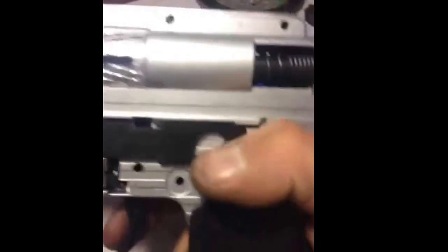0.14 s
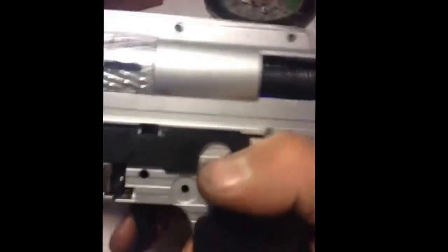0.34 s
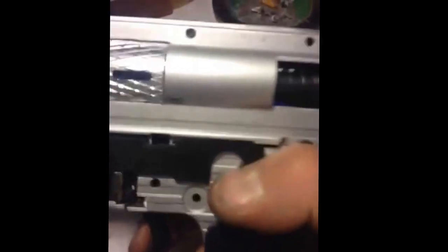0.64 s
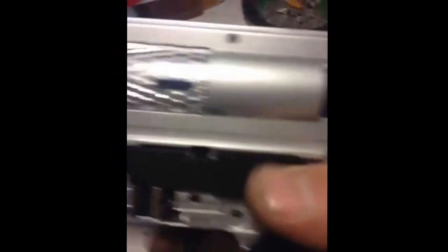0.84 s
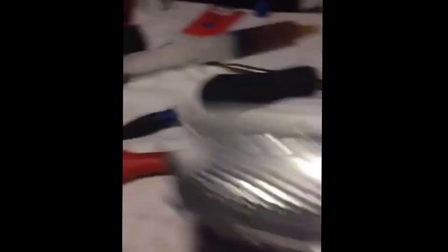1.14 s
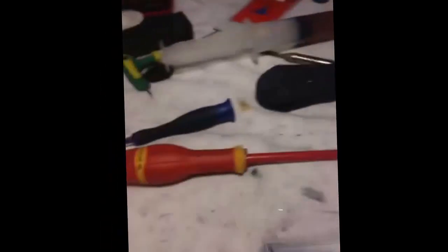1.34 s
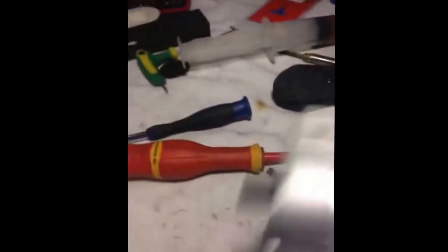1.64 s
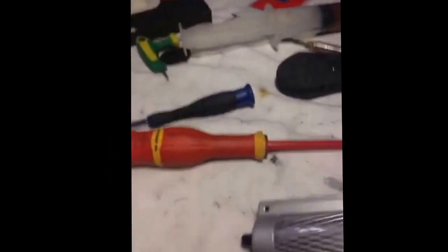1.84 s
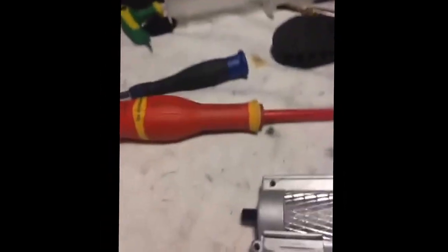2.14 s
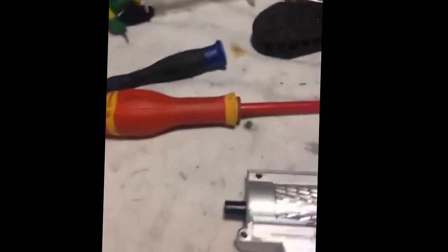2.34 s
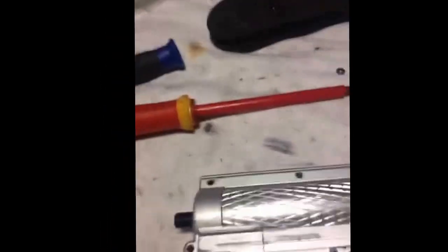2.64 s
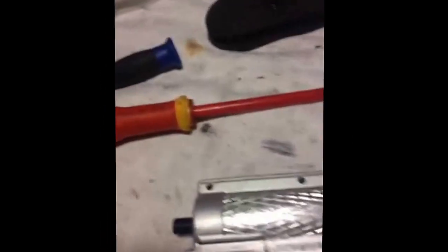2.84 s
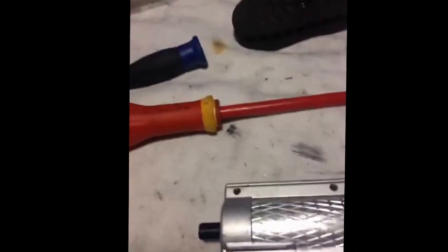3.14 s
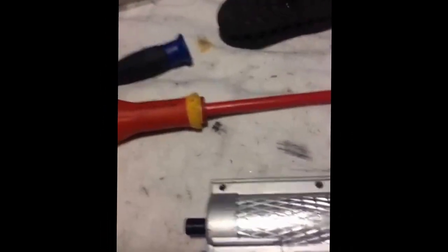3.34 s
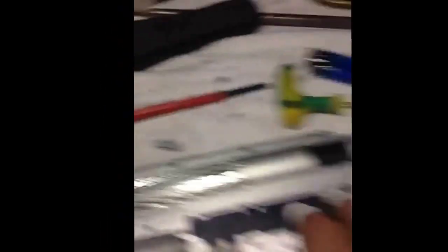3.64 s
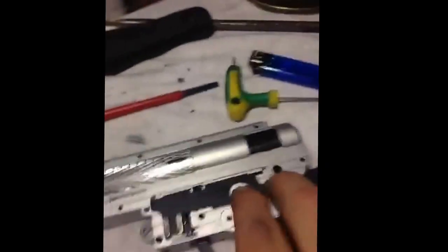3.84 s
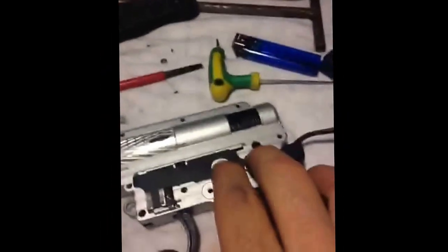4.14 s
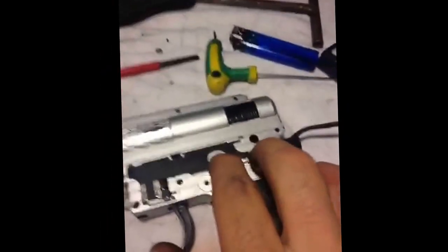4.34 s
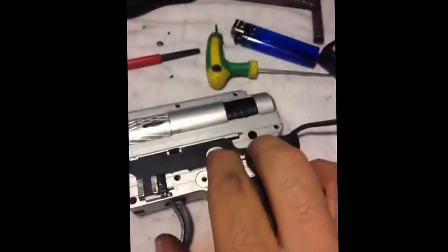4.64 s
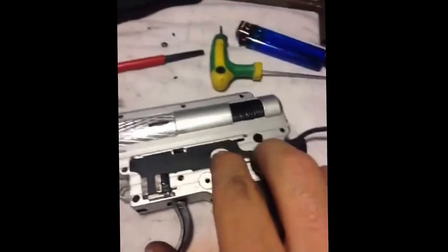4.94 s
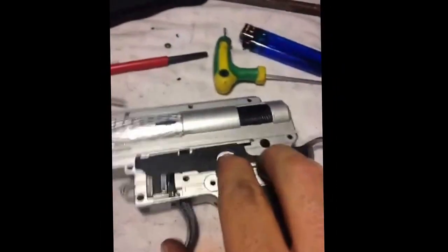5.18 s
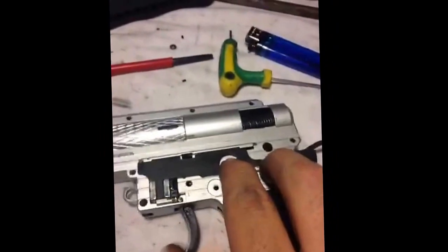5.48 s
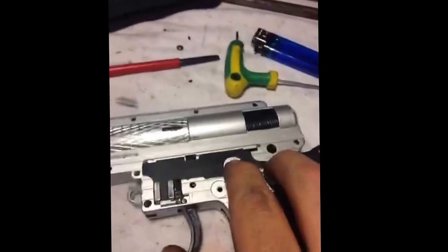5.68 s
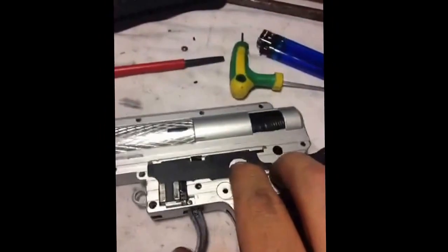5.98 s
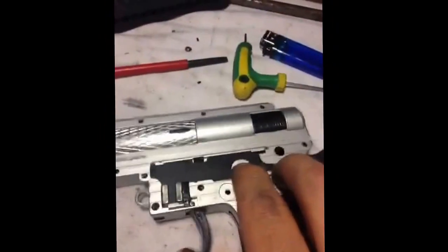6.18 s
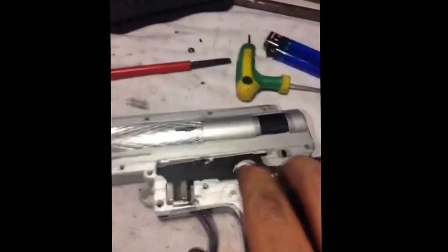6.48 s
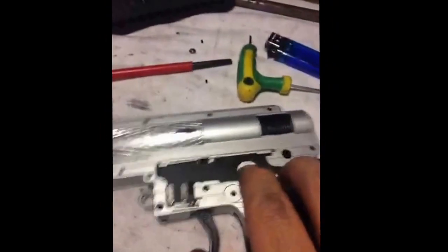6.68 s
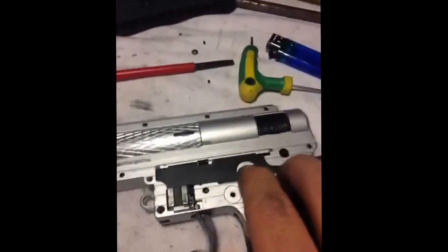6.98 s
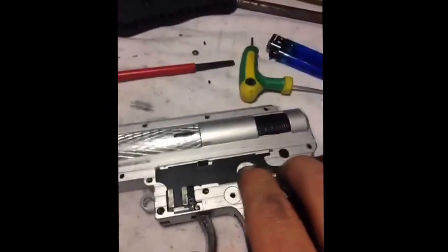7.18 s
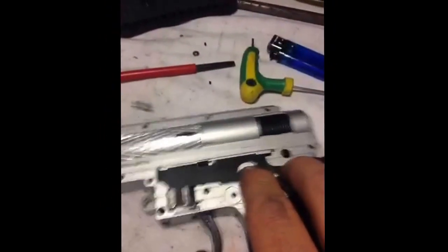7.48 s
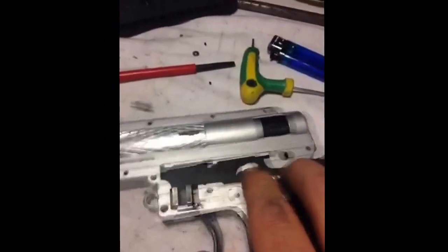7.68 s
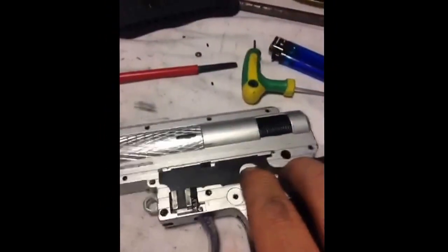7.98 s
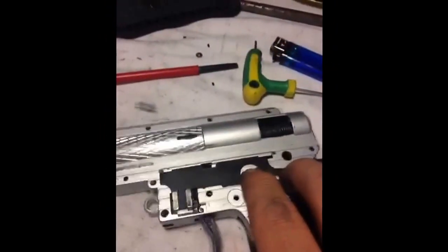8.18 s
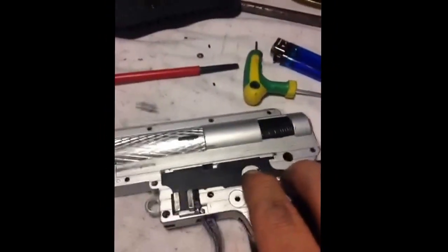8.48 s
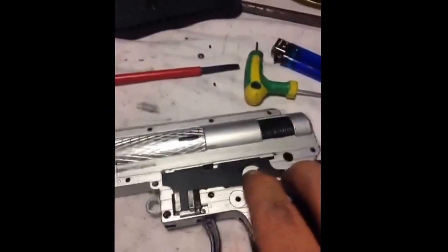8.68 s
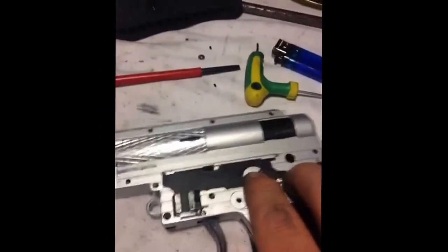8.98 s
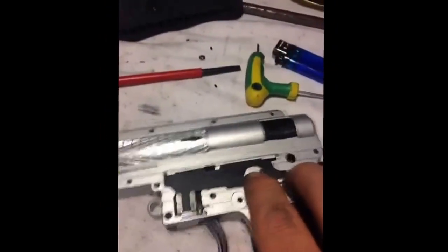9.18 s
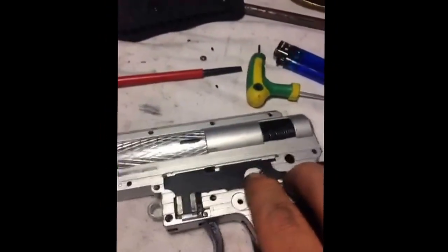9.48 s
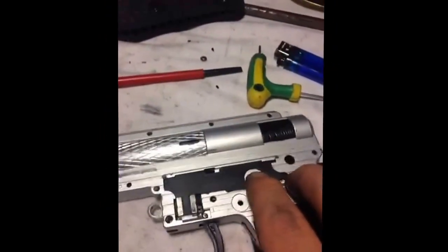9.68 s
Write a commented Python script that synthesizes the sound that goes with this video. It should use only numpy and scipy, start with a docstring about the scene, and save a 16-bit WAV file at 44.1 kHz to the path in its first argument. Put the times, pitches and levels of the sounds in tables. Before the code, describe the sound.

Two sharp electric gearbox clacks start right at the microphone, with a thin spring ringing after them. Light ticks, finger rubbing and woody bench knocks lead to one harder set-down clack. Quiet room noise with a barely audible thin tone fills the gap. Then the mechanism cycles repeatedly on the bench, zipping and slamming in fast, slightly uneven succession, dry and bright with a short workshop reverberation.

```python
"""Airsoft gearbox, dry-fired in a workshop

Small workshop, phone microphone close by: two shots in the hand, a few knocks as the bare gearbox is handled
and set down on the bench, then twenty shots in quick succession. In each shot gear-tooth impacts rasp while
they wind the spring, then the piston slams home and bounces once, ringing the shell with decaying modes.
Fingers rub and tick, a thin tone passes in the pause, and soft noise and a short reverberation fill the room."""
import sys
import numpy as np
from scipy import signal
from scipy.fft import rfft, irfft
from scipy.io import wavfile
from scipy.ndimage import uniform_filter1d

SR = 44100
rng = np.random.default_rng(int(sys.argv[2]) if len(sys.argv) > 2 else 0)


def digitize_waveform(pressure):
    """Quantize a signal to 16-bit integers and store it at the path in sys.argv[1].

    Rows of a 2-D input are taken as channels; values are limited to [-1, 1].
    """
    field = np.atleast_2d(pressure).T
    bounded = np.clip(field, -1, 1)
    quanta = np.round(bounded * 32767).astype(np.int16)
    wavfile.write(sys.argv[1], SR, quanta)


N = 433062
T = np.arange(N) / SR  # time in seconds


def undb(db):
    """Decibels to gain."""
    return 10 ** (np.asarray(db) / 20)


def unit(x):
    """Scale to an rms of 1."""
    return x / np.sqrt(np.mean(x ** 2))


def add(out, s, x):
    """Mix x into out from time s."""
    i = max(int(s * SR), 0)
    out[i:i + len(x)] += x[:len(out) - i]


def convolve(x, response):
    """Pass x through an impulse response."""
    return signal.fftconvolve(x, response)[:len(x)]


def high_pass(x, hz, order):
    """Remove the bass under hz."""
    return signal.sosfilt(signal.butter(order, hz, "high", fs=SR, output="sos"), x)


def colour(points, peaks=(), size=4096):
    """Causal (minimum-phase) response of unit energy from a smooth spectrum and its resonances."""
    f = np.fft.rfftfreq(size, 1 / SR) + 1
    hz, level_db = np.transpose(points)
    db = np.interp(np.log(f), np.log(hz), level_db)
    for centre_hz, width_hz, peak_db in peaks:
        db = db + peak_db / (1 + (2 * (f - centre_hz) / width_hz) ** 2)
    # folding the cepstrum onto positive times makes the response causal
    cepstrum = irfft(np.log(undb(db)))
    cepstrum[1:size // 2] *= 2
    cepstrum[size // 2 + 1:] = 0
    response = irfft(np.exp(rfft(cepstrum)))
    return response / np.linalg.norm(response)


def fade(t, t60):
    """Exponential decay, 60 dB down after t60 seconds."""
    return np.exp(-np.log(1000) * t / t60)


def swell(start_s, length_s):
    """A smooth rise and fall of height 1."""
    return np.sin(np.pi * np.clip((T - start_s) / length_s, 0, 1))


def push(ms):
    """Half-sine contact force of height 1."""
    return np.sin(np.pi * np.minimum(T[:SR // 50] * 10 ** 3 / ms, 1))


def burst(response, t60):
    """A short noisy click with the colour of a response."""
    t = T[:SR // 5]
    return convolve(rng.standard_normal(len(t)) * fade(t, t60), response)


def ring(modes, t, detune):
    """Decaying modes, a little differently tuned at each blow."""
    out = np.zeros(len(t))
    for hz, db, t60 in modes:
        tuned_hz = hz * (1 + detune * rng.standard_normal())
        out += undb(db) * fade(t, t60) * np.sin(2 * np.pi * tuned_hz * t)
    return out


# Spectrum of the quiet room at the microphone. Each row: frequency in Hz, relative density in dB per Hz.
AIR_SPECTRUM = [(30, -25.5), (70, -23.5), (135, -2), (210, -2), (330, -7), (400, -16.5), (650, -15.5),
                (1200, -20), (4000, -25), (10000, -32), (15000, -27.5)]
AIR_DB = -64.5  # rms before the microphone


def air():
    """Quiet room: noise shaped to be soft and low with a faint hiss."""
    return undb(AIR_DB) * unit(convolve(rng.standard_normal(N), colour(AIR_SPECTRUM)))


def teeth(t, start_hz=1500, top_hz=2500, spin_up_s=.025, scatter_db=4, scrape=1.0, wobble=0.07):
    """Tooth impacts speed up with the motor and throb once a turn of the ten-tooth pinion."""
    slip, speed_spread = .22, .06  # timing scatter in teeth; spread of motor speed between shots
    hz = top_hz + (start_hz - top_hz) * np.exp(-t / spin_up_s)
    hz = hz * (1 + speed_spread * rng.standard_normal())
    tooth = np.cumsum(hz) / SR  # teeth passed so far
    count = int(tooth[-1])
    late, hard = rng.standard_normal((2, count))
    at = np.interp(np.arange(count) + slip * late, tooth, np.arange(len(t))).astype(int)
    impacts = np.bincount(at, undb(scatter_db * hard), len(t))
    rasp = unit(impacts - impacts.mean()) + scrape * rng.standard_normal(len(t))
    return unit(rasp * (1 + wobble * np.sin(2 * np.pi * tooth / 10)))


# Shots beside the microphone. Each row: motor start in seconds, piston slam in seconds, then relative levels
# in dB of the gears, the slam and the low thump.
SHOTS = [(0.268, 0.3278, -7.5, -1, -4), (0.513, 0.575, -7.5, -2.5, -14.5), (4.729, 4.789, -8, -2, -18.5),
         (5.083, 5.1384, -10.5, -3.5, -2), (5.486, 5.544, -9.5, -3.5, -1),
         (5.771, 5.827, -10.5, -3.5, -4.5), (5.997, 6.053, -13, -2, -8.5), (6.185, 6.245, -13, -2, -5),
         (6.396, 6.458, -12.5, -2, -16), (6.581, 6.6428, -13, -3.5, -22), (6.791, 6.8516, -13.5, -3, -7.5),
         (6.974, 7.035, -12.5, -3.5, -6), (7.187, 7.246, -11.5, -3, -15.5),
         (7.374, 7.4343, -13, -2.5, -8.5), (7.6, 7.661, -12, -3, -6), (7.818, 7.881, -11, -3.5, -16),
         (8.018, 8.0798, -11, -3.5, -13), (8.237, 8.2961, -10.5, -1, -13), (8.467, 8.529, -10.5, -3, -4),
         (8.855, 8.917, -9.5, 0, -18), (9.069, 9.1323, -11.5, -2, 0), (9.282, 9.3401, -11.5, -7, -7)]
SET_DOWN_S = 2.2  # in the hand before this, on the bench after
# Gear rasp radiated by the shell, in the hand and on the bench. Each row: frequency in Hz, relative level in dB.
RASP_HELD = [(35, -49), (60, -25.5), (633, -9), (1100, -8), (1630, -2), (3190, -5), (3750, -5),
             (6380, -4.5), (7330, -2.5), (9900, -8.5), (15000, -12)]
RASP_BENCH = [(35, -40.5), (60, -26), (209, -0.5), (564, -7.5), (1100, -3.5), (1750, 0), (2470, -3.5),
              (3930, -7), (4730, -3.5), (5180, -7), (7330, -6), (7860, -6.5), (9230, -3.5), (10100, -9.5),
              (15000, -12)]
# Resonances standing out of that rasp. Each row: frequency in Hz, width in Hz, height in dB.
PEAKS_HELD = [(3190, 300, 5), (4500, 720, 3.5), (6400, 560, 4.5), (9440, 410, 6.5), (11390, 550, 5)]
PEAKS_BENCH = [(254, 17, 4), (1658, 70, 1.4), (2280, 500, 2.7), (3170, 530, 4.6), (4520, 640, 1.7),
               (7940, 1100, 6.3), (9070, 400, 3.9)]
REST_S = 1  # a shot after a longer pause than this starts with the gears already under load
SLACK_DB, RESTED_SLACK_DB = -12, 1  # rasp at the start of winding re its end: in a run, and after a rest
LATCH_S, LATCH_DB = 0.0044, -12.5  # anti-reversal latch as the gears take up: delay, level re the rasp


def gears(attack_s=0.015, loaded=.68, coast_t60=0.068, held_db=0, bench_db=-1.5):
    """The latch clicks; the rasp changes with spring load and dies quickly once the piston is let go."""
    out, t, last_slam = np.zeros(N), T[:SR // 8], -np.inf
    held = undb(held_db) * colour(RASP_HELD, PEAKS_HELD)
    lying = undb(bench_db) * colour(RASP_BENCH, PEAKS_BENCH)
    for start, slam, db, _, _ in SHOTS:
        wind_s = slam - start
        shell = held if start < SET_DOWN_S else lying
        slack_db = RESTED_SLACK_DB if start - last_slam > REST_S else SLACK_DB
        load = undb(db + slack_db * np.maximum(1 - t / (loaded * wind_s), 0))
        take_up = np.sin(np.pi / 2 * np.minimum(t / attack_s, 1)) ** 2
        coast = fade(np.maximum(t - wind_s, 0), coast_t60)
        add(out, start, convolve(teeth(t) * load * take_up * coast, shell))
        add(out, start + LATCH_S, undb(db + LATCH_DB) * burst(shell, t60=0.0149))
        last_slam = slam
    return out


RACK_TEETH = 9
RACK_DB, RACK_T60_S = -3.5, 0.012  # clack level re the rasp, and decay


def rack(scatter_db=3, slip=.2):
    """The sector gear picks up the piston's teeth one by one: a coarse, uneven grain in the rasp."""
    out = np.zeros(N)
    body = colour(RASP_BENCH, [(2200, 1600, 7)])  # clack resonance: Hz, width Hz, dB
    for start, slam, db, _, _ in SHOTS:
        for k, (late, hard) in enumerate(rng.standard_normal((RACK_TEETH, 2))):
            share = (k + 2 + slip * late) / (RACK_TEETH + 2)  # of the wind
            gain = share ** .5 * undb(db + RACK_DB + scatter_db * hard)
            add(out, start + share * (slam - start), gain * burst(body, RACK_T60_S))
    return out


# Shell modes struck by the piston. Each row: frequency in Hz, relative level in dB, 60 dB decay in seconds.
SHELL_MODES = [(650, -36.5, 0.029), (1103, -2, 0.024), (1278, -14.5, 0.035), (1810, -12, 0.04),
               (2430, -17.5, 0.0089), (342, -39, 0.24), (937, -40.5, 0.46), (939, -26, 0.19),
               (1153, -39, 0.27), (1280, -32, 0.28), (1496, -42, 0.52), (1850, -37.5, 0.28)]
# Crack of the piston head. Each row: frequency in Hz, relative level in dB.
CRACK_SPECTRUM = [(100, -19.5), (400, 2), (1500, 7.5), (3000, -1), (4700, 3), (6500, 3), (9000, -3.5),
                  (12000, -3.5), (14700, -21.5)]
# The spring sings on after a blow. Each row: frequency in Hz, relative level in dB, 60 dB decay in seconds.
SPRING_MODES = [(1914, -68, 1.6), (2304, -71, 2.0), (1809, -72, 1.6), (2218, -73, 1.5)]
BOUNCE_S, BOUNCE_SPREAD = .0052, .06  # the piston lands again this much later; share by which that varies


def piston(crack_db=-3, rattle_db=-17, rattle_t60=0.14, shell_db=1, held_db=-5,
           puff_db=-9, puff_ms=3.0, bounce_db=-5, bounce_puff_db=-1):
    """Each slam cracks, rattles and rings the shell and puffs air; the piston lands again, more softly."""
    out, t, crack = np.zeros(N), T[:SR // 2], colour(CRACK_SPECTRUM)
    for start, slam, _, db, thump_db in SHOTS:
        bounce = slam + BOUNCE_S * (1 + BOUNCE_SPREAD * rng.standard_normal())
        grip_db = held_db if start < SET_DOWN_S else 0  # a hand damps the shell
        blows = [(slam, db, thump_db), (bounce, db + bounce_db, thump_db + bounce_puff_db)]
        for s, blow_db, air_db in blows:
            add(out, s, undb(blow_db + crack_db) * burst(crack, t60=.012))
            add(out, s, undb(blow_db + rattle_db) * burst(crack, rattle_t60))
            add(out, s, undb(blow_db + shell_db + grip_db) * ring(SHELL_MODES, t, detune=0.009))
            add(out, s, -undb(air_db + puff_db) * push(puff_ms) ** 2)
        spring_db = 10 if start < SET_DOWN_S else 0  # in the hand the spring is right at the microphone
        add(out, slam, undb(db + spring_db) * ring(SPRING_MODES, T[:2 * SR], detune=.0003))
    return out


# Light ticks of loose parts. Each row: time in seconds, relative level in dB, frequency in Hz.
TICKS = [(1.015, -41, 1880), (1.0395, -39, 1920), (1.2211, -37, 3080), (1.667, -43, 2300),
         (1.767, -49, 2990), (1.7786, -39, 2910), (2.0394, -39.5, 4630), (2.7204, -49.5, 3100)]
# Fingers sliding on the shell. Each row: middle in seconds, length in seconds, relative peak level in dB.
SLIDES = [(1.25, 0.91, -65), (1.678, 0.24, -62.5), (2.047, 0.68, -55), (2.871, .07, -63), (4.201, .35, -77),
          (4.659, 0.33, -72)]


def handling(tick_db=-7, tick_t60=0.018, grain_db=3):
    """Small ticks as noise bursts, and the grainy rub of fingers on metal as roughened noise."""
    out = np.zeros(N)
    for s, db, hz in TICKS:
        tick = colour([(hz / 8, -14), (hz, 0), (hz * 4, -14)])
        add(out, s, undb(db + tick_db) * burst(tick, tick_t60))
    grip = unit(uniform_filter1d(rng.standard_normal(N), SR // 80))
    skin = colour([(300, 3.5), (2000, 2.5), (6000, -2), (14000, -18.5)])  # Hz, dB
    rub = convolve(rng.standard_normal(N) * undb(grain_db * grip), skin)
    for middle_s, length_s, db in SLIDES:
        out += rub * undb(db) * swell(middle_s - length_s / 2, length_s) ** 2
    return out


# Handling knocks on the bench. Each row: time in seconds, relative level in dB, contact time in ms,
# click in dB re the knock.
KNOCKS = [(1.013, -48.5, 3.7, -15.5), (1.351, -10.5, 1.54, -18.5), (1.624, -32, 4.1, -36),
          (1.82, -10.5, 1.6, -17), (1.972, -8, 1.86, -21.5), (2.092, -26, 3.8, -35), (2.2, 2, 0.83, -11.5)]
# Bench top modes. Each row: frequency in Hz, relative level in dB, 60 dB decay in seconds.
BENCH_MODES = [(160.4, -18, 0.25), (217, -13.5, 0.099), (270, -6, .06), (338, -3, 0.042), (442, 0, 0.023),
               (675.6, 0.5, 0.032), (914, -4, 0.013), (1210, -21.5, 0.0161), (186, -28.5, 0.51),
               (259.3, -20.5, .33), (320, -15, 0.28)]
# Metal meeting the bench. Each row: frequency in Hz, relative level in dB.
CLICK_SPECTRUM = [(100, -9.5), (400, 16.5), (1000, 16), (1700, 6.5), (4000, 2), (9000, 0.5), (14500, -4)]
# Things lying on the bench jostle after a knock. Each row: frequency in Hz, relative level in dB.
JOSTLE_SPECTRUM = [(100, -13), (200, 0.5), (350, -4), (550, -8), (900, -7), (1400, -14.5), (4000, -34)]


def knocks(thud_db=-1, click_t60=0.076, spring_db=-4, radiate_hz=140, jostle_db=-19, jostle_t60=0.35):
    """Dull bench blows, lower for a longer contact; loose things jostle, metal clicks, the spring sings."""
    out, t = np.zeros(N), T[:SR]
    click, loose = colour(CLICK_SPECTRUM), colour(JOSTLE_SPECTRUM)
    for s, db, contact_ms, click_db in KNOCKS:
        force = push(contact_ms)
        thud = high_pass(convolve(ring(BENCH_MODES, t, detune=0.03), force), radiate_hz, order=3)
        add(out, s, undb(db + thud_db) * thud / np.abs(thud).max())
        jostle = convolve(burst(loose, jostle_t60), force / force.sum())
        add(out, s, undb(db + jostle_db) * jostle)
        add(out, s + 0.002, undb(db + click_db - 3) * burst(click, click_t60))
        add(out, s, undb(db + spring_db) * ring(SPRING_MODES, t, detune=.0003))
    return out


TONE_S, TONE_LENGTH_S, TONE_DB = 2.82, 1.05, -75  # start, length, peak before the microphone
TONE_HZ, TONE_GLIDE_HZ, TONE_GLIDE_S = 637, 85, 0.16  # final pitch, how far below it starts, glide time


def faint_tone():
    """A thin sine in the pause glides up to its pitch, swelling and fading."""
    hz = TONE_HZ - TONE_GLIDE_HZ * np.exp(-np.maximum(T - TONE_S, 0) / TONE_GLIDE_S)
    return undb(TONE_DB) * swell(TONE_S, TONE_LENGTH_S) * np.sin(2 * np.pi * np.cumsum(hz) / SR)


def recoil(push_db=-18, contact_ms=5.4):
    """Lying on the bench, the gearbox thumps the top with every slam and excites its modes."""
    out = np.zeros(N)
    for _, slam, _, _, thump_db in SHOTS:
        if slam > SET_DOWN_S:
            thud = convolve(ring(BENCH_MODES, T[:SR // 2], detune=0.036), push(contact_ms))
            add(out, slam, -undb(thump_db + push_db) * thud / np.abs(thud).max())
    return high_pass(out, 84, order=3)


# Workshop reverberation. Each row: frequency in Hz, 60 dB decay in seconds, relative level in dB.
ROOM_BANDS = [(100, 0.082, -13), (243, 0.26, -5), (434, 0.5, -16.5), (1030, 0.44, -4.5), (2200, 0.42, -5),
              (4700, 0.37, -3.5), (8584, 0.28, -8), (14495, 0.22, -5)]
WALL_S, WALL_DB = .023, -20.5  # one distinct reflection from a nearby wall


def room(x, gap_s=.004, build_s=0.011, early_db=2, early_s=0.012, count=6):
    """A wall echo and a short tail; moving parts radiate from changing places, so reflections take turns."""
    t = T[:2 * SR // 3]
    f = np.fft.rfftfreq(len(t), 1 / SR) + 1
    hz, t60, db = np.transpose(ROOM_BANDS)
    # overlapping bands, each with its own decay
    bands = np.array([np.interp(np.log(f), np.log(hz), share) for share in np.eye(len(hz))])
    build_up = np.clip((t - gap_s) / build_s, 0, 1)
    shape = build_up * fade(t, t60[:, None]) * undb(early_db * np.exp(-t / early_s))
    shape *= (undb(db - 5.5) / np.linalg.norm(shape, axis=1))[:, None]
    place = T / .014  # a new pattern of reflections fades in every 14 ms
    out = np.zeros(N)
    add(out, WALL_S, undb(WALL_DB) * x)
    for k in range(count):
        noise = irfft(bands * rfft(rng.standard_normal(len(t))), n=len(t))
        tail = np.sum(shape * noise, axis=0)
        turn = np.sin(np.pi / 2 * np.minimum((place - k) % count, 2))
        out += convolve(x * turn, tail)
    return out


def scene(shot_db=6, knock_db=3, gears_wet_db=-1, piston_wet_db=-1, bench_wet_db=-2):
    """Gearbox and bench sound into the workshop, each with its own share of reverberation."""
    rasp = undb(shot_db) * (gears() + rack())
    slams = undb(shot_db) * piston() + handling()
    bench = undb(knock_db) * knocks() + undb(shot_db) * recoil()
    echo = room(undb(gears_wet_db) * rasp + undb(piston_wet_db) * slams + undb(bench_wet_db) * bench)
    return (rasp + slams + bench + echo + air() + faint_tone())[None]


def gain_control(x, threshold_db=-27, slope=0.26, release_db_s=22):
    """The gain dips while a loud sound passes and creeps back as the held level falls."""
    power = signal.lfilter([1 / 200], [1, 1 / 200 - 1], x ** 2)  # smoothed over about 200 samples
    level_db = 10 * np.log10(power + 1e-12)
    held_db = np.maximum.accumulate(level_db + release_db_s * T) - release_db_s * T
    return x * undb(-slope * np.maximum(held_db - threshold_db, 0))


TOP_HZ = 15450  # upper limit of the phone


def record(dry, bass_hz=92):
    """The phone thins the bass, rides its gain, rounds the highest peaks and cuts the top."""
    ceiling = 1.2
    thinned = high_pass(dry[0], bass_hz, order=2)
    rounded = ceiling * np.tanh(gain_control(thinned) / ceiling)
    return signal.sosfilt(signal.ellip(12, .2, 80, TOP_HZ, fs=SR, output="sos"), rounded)[None]


dry = scene()
out = record(dry)
digitize_waveform(out)
```